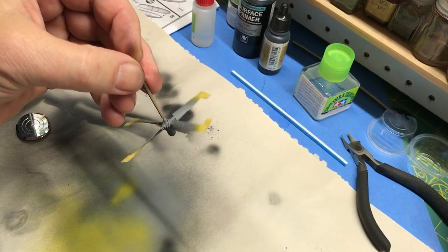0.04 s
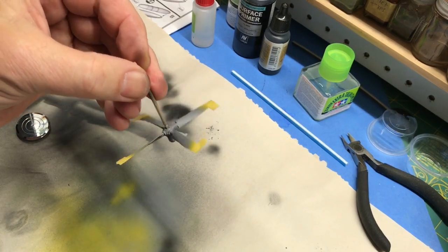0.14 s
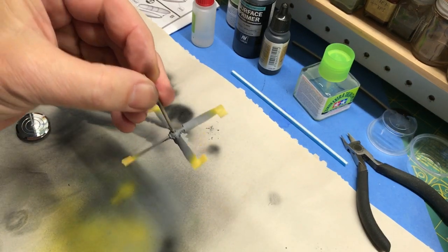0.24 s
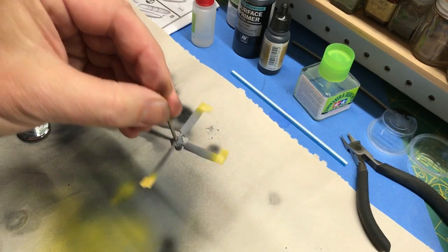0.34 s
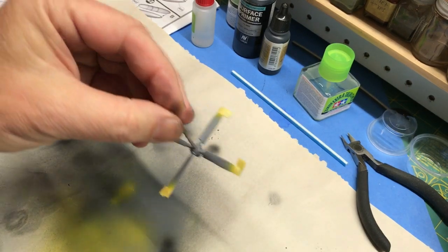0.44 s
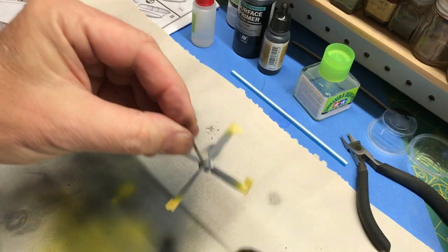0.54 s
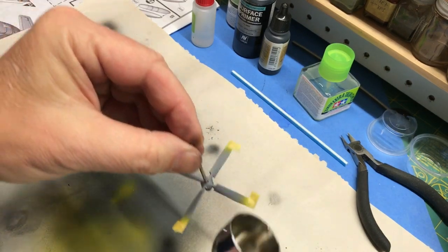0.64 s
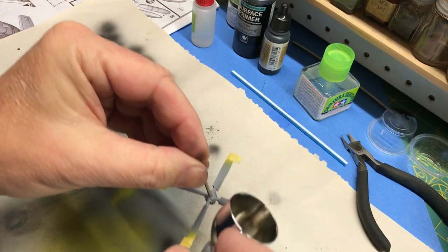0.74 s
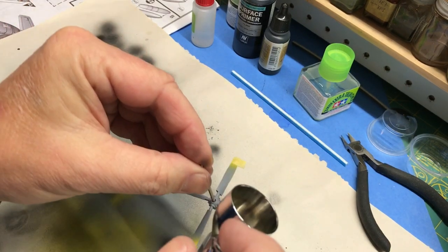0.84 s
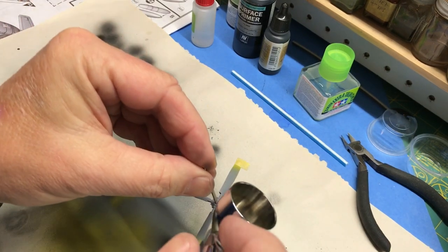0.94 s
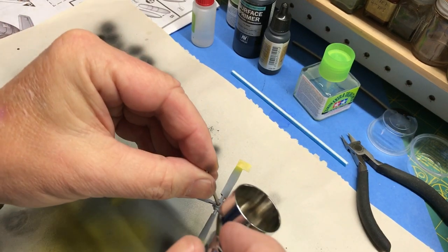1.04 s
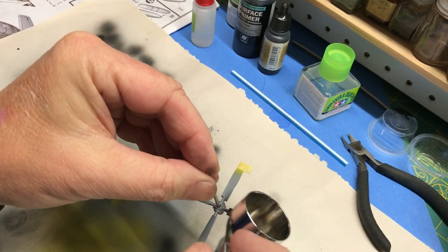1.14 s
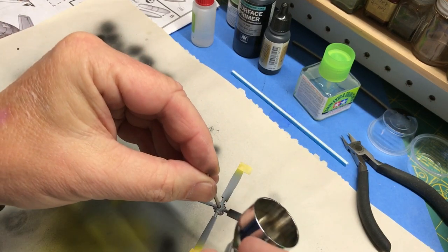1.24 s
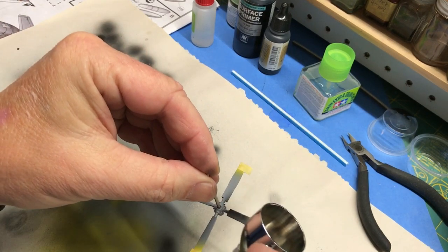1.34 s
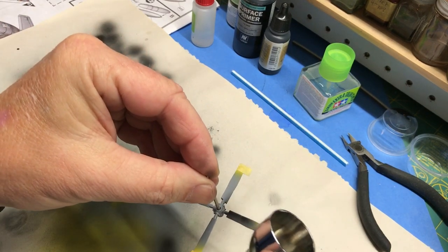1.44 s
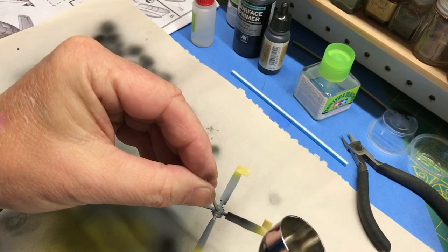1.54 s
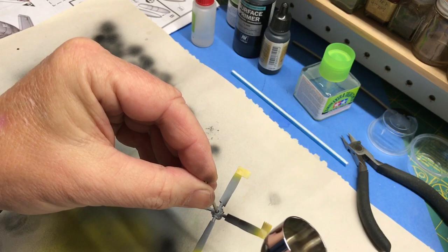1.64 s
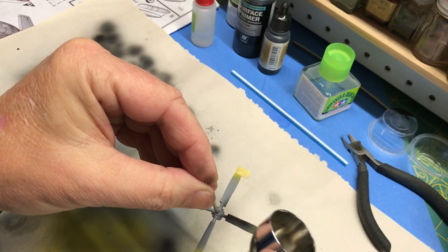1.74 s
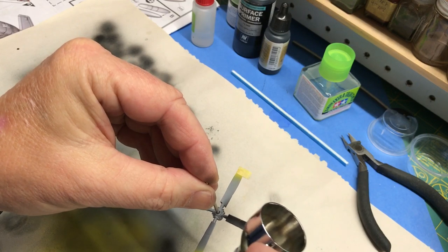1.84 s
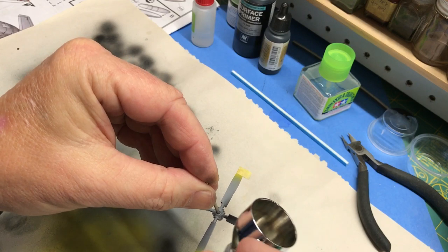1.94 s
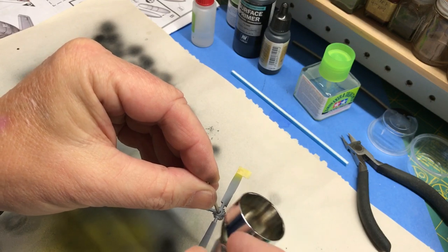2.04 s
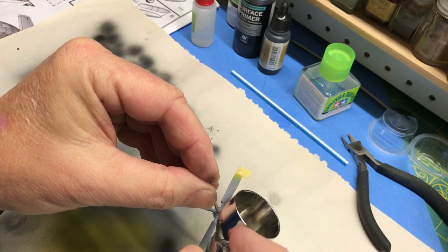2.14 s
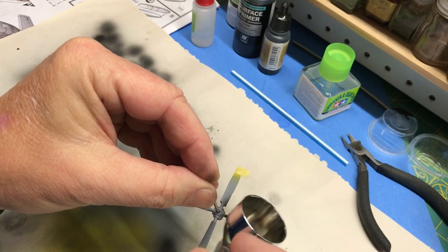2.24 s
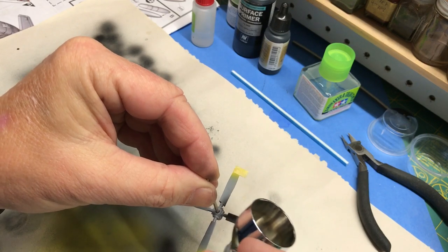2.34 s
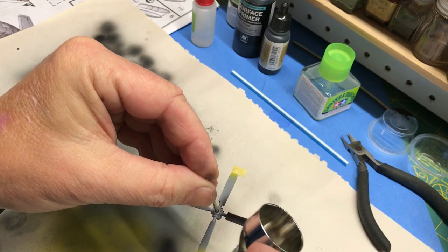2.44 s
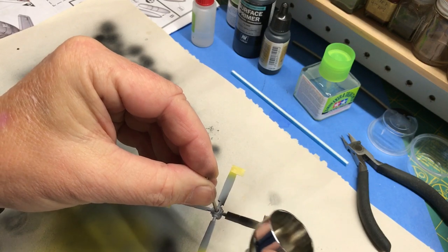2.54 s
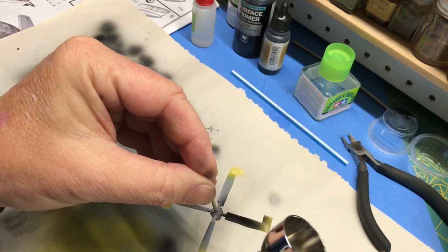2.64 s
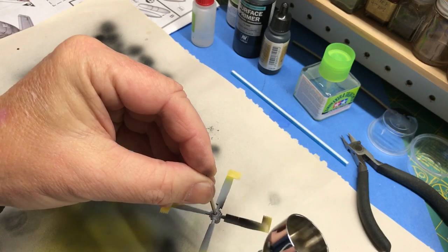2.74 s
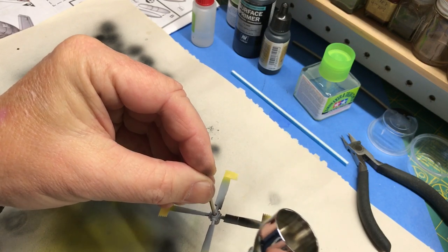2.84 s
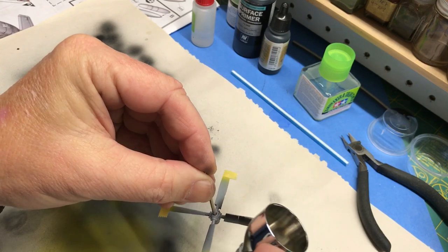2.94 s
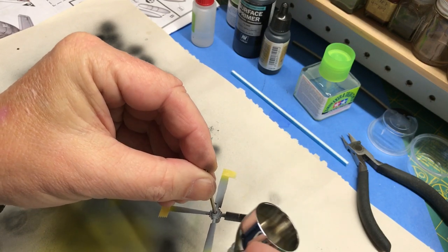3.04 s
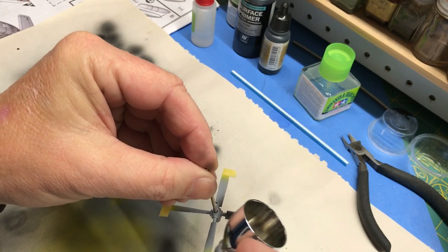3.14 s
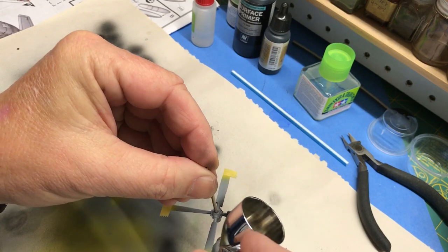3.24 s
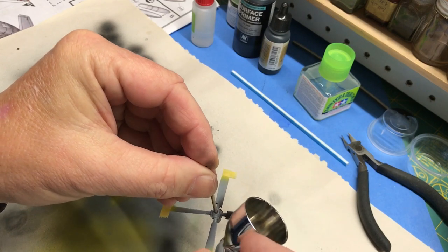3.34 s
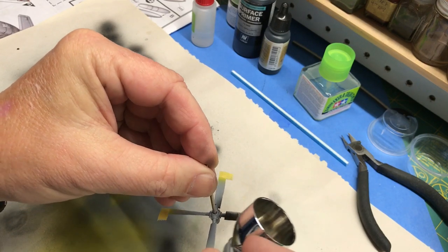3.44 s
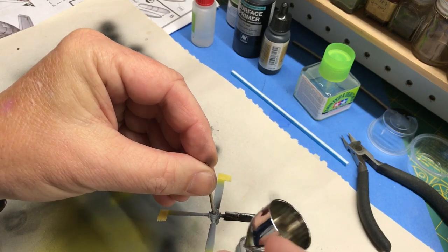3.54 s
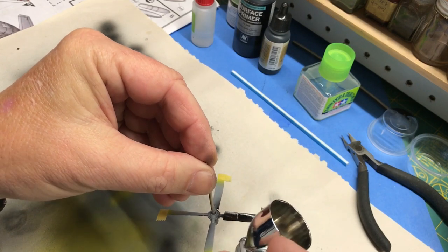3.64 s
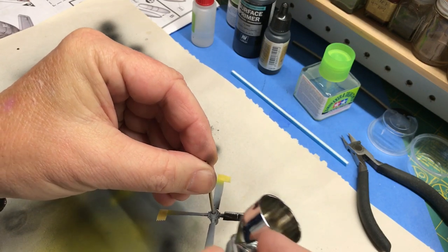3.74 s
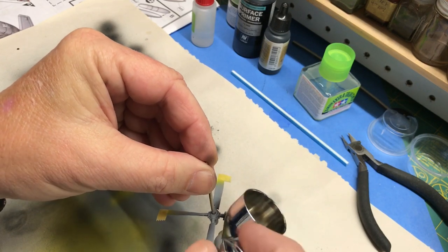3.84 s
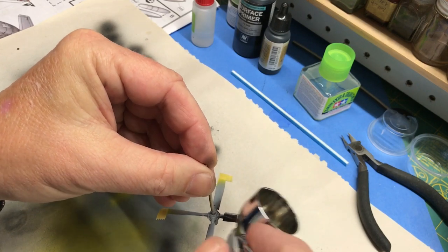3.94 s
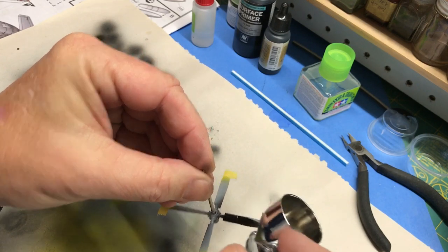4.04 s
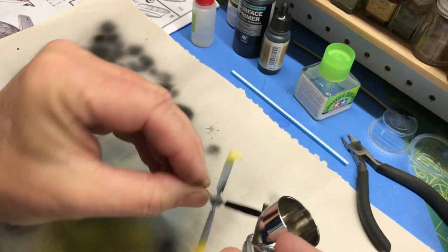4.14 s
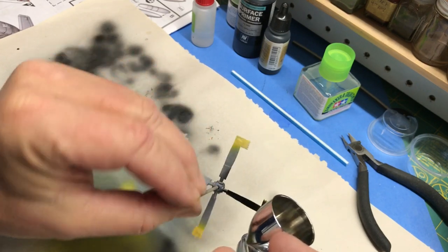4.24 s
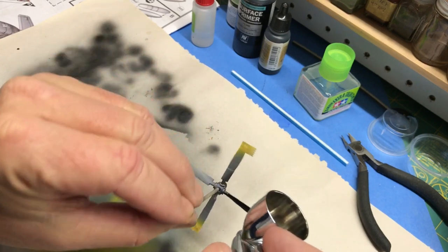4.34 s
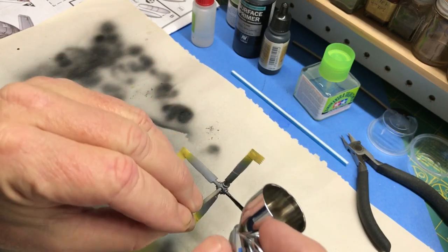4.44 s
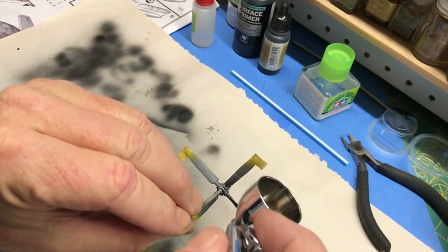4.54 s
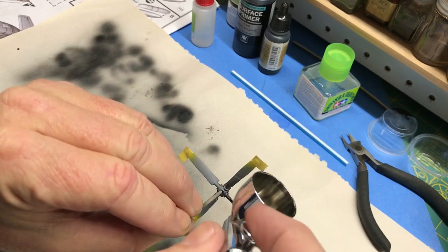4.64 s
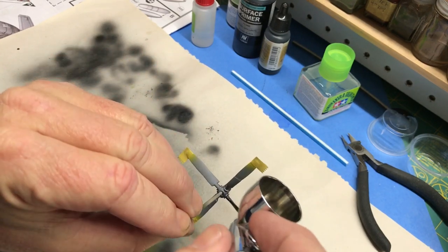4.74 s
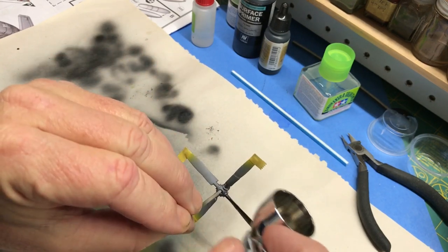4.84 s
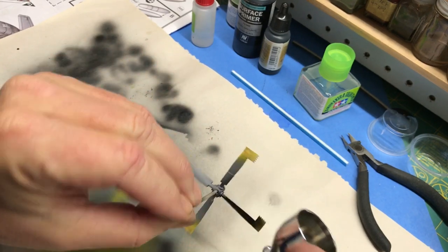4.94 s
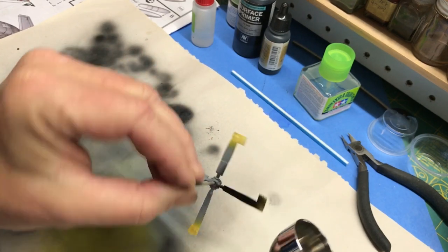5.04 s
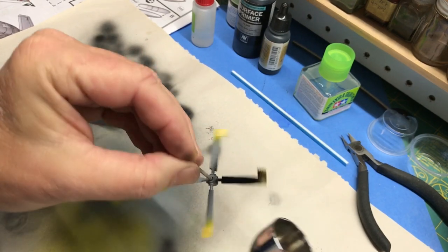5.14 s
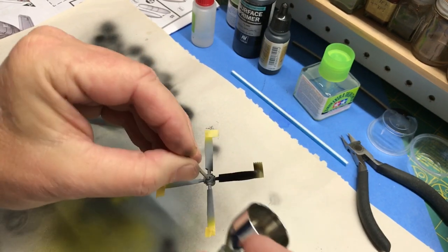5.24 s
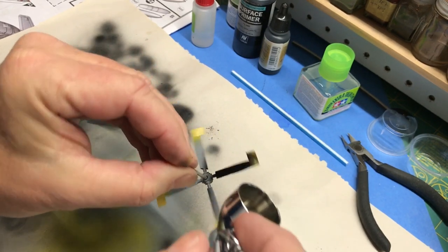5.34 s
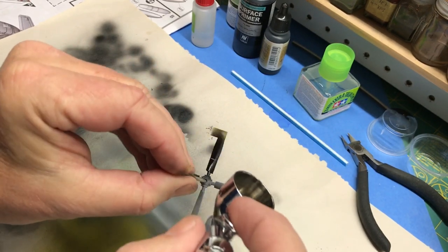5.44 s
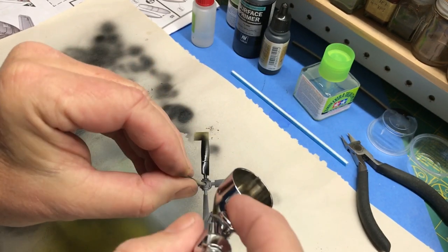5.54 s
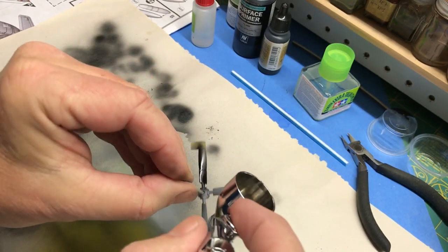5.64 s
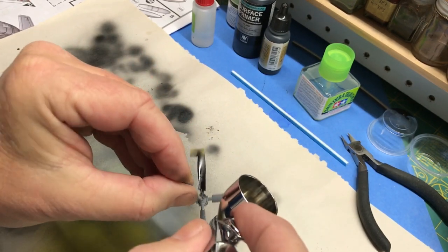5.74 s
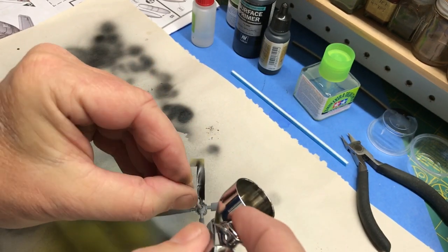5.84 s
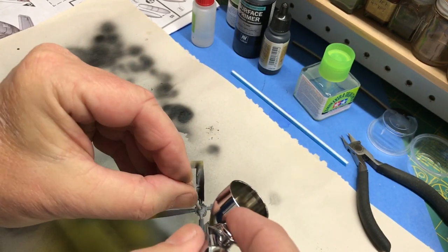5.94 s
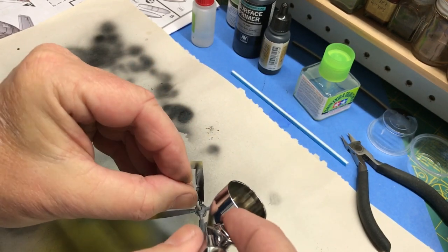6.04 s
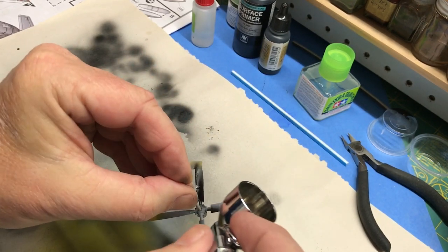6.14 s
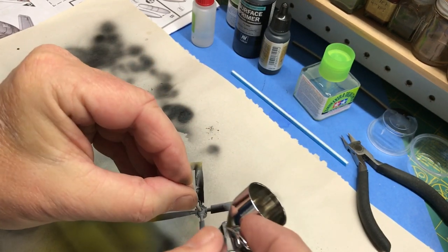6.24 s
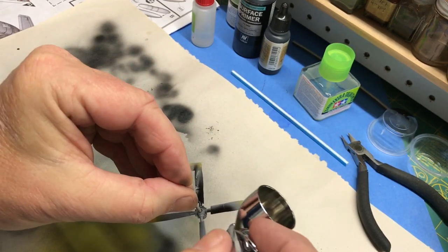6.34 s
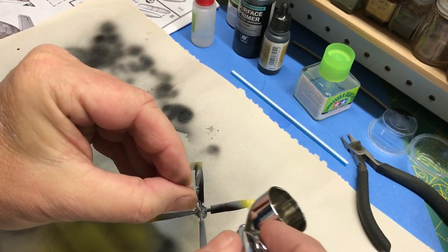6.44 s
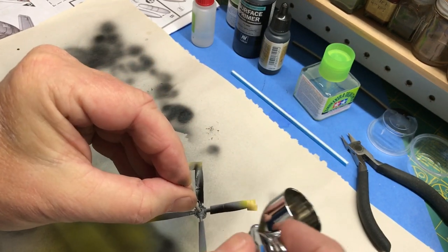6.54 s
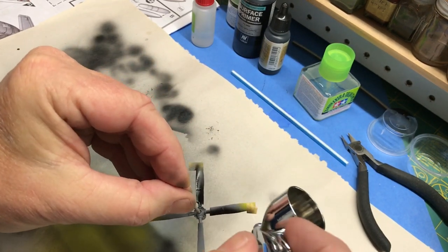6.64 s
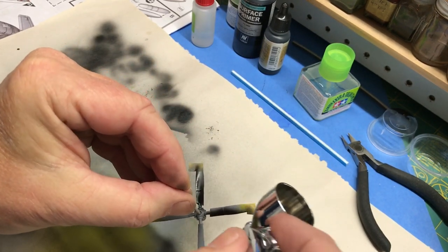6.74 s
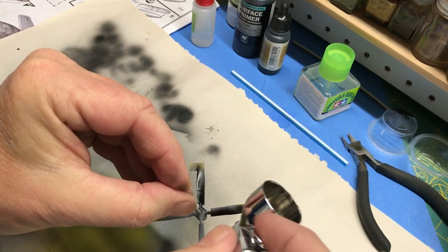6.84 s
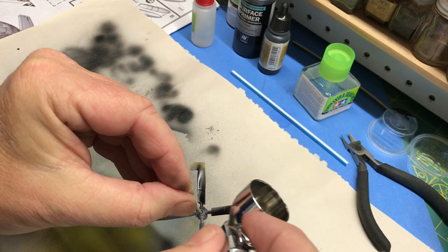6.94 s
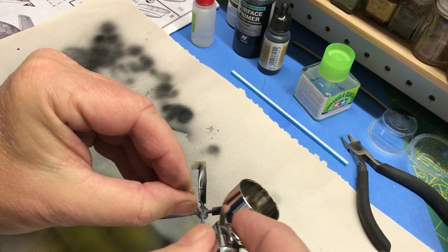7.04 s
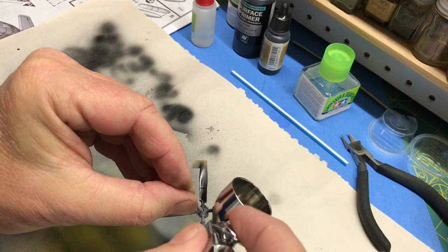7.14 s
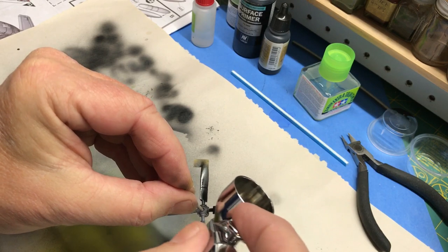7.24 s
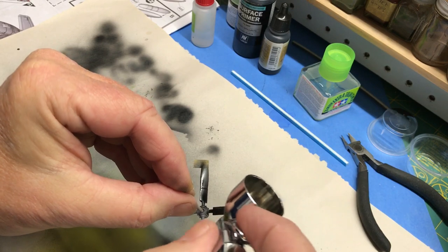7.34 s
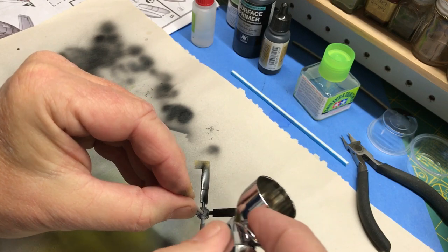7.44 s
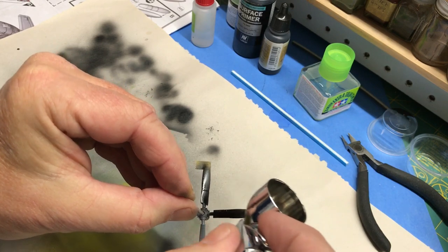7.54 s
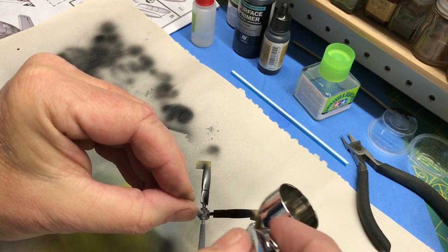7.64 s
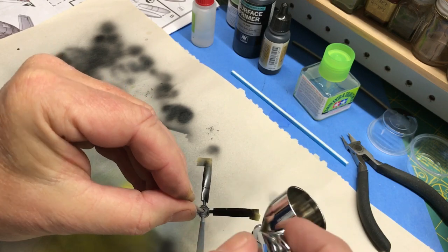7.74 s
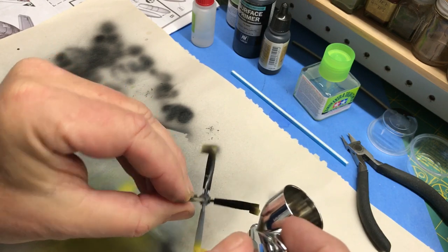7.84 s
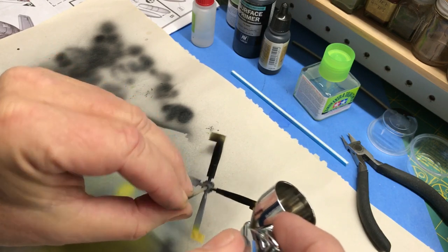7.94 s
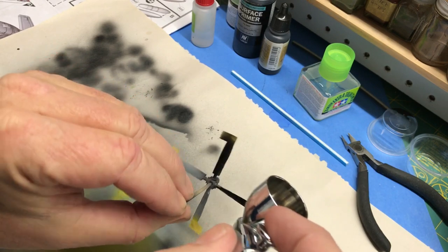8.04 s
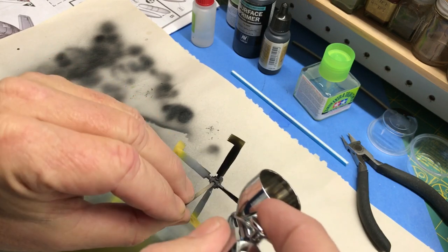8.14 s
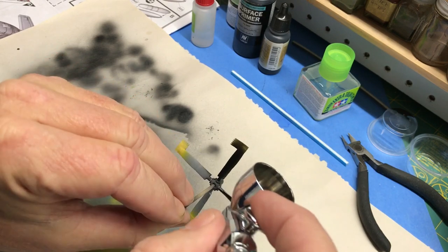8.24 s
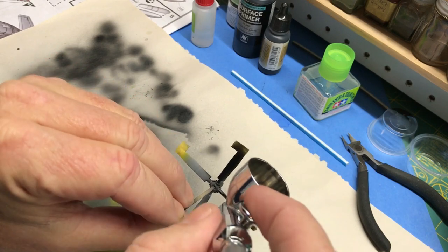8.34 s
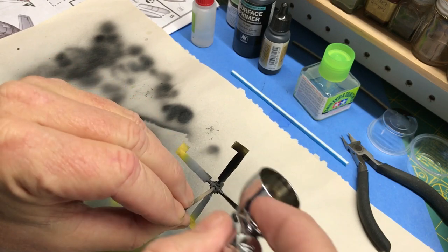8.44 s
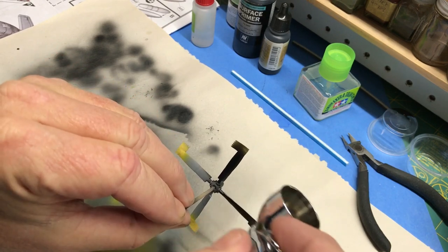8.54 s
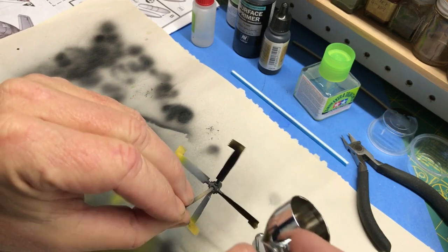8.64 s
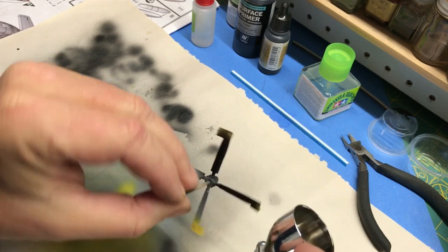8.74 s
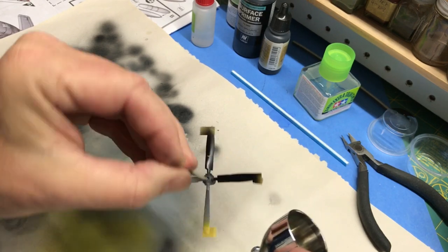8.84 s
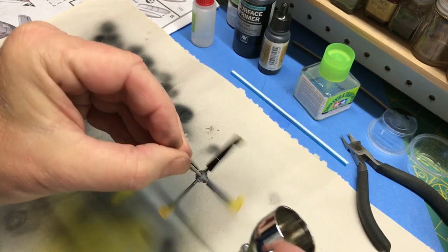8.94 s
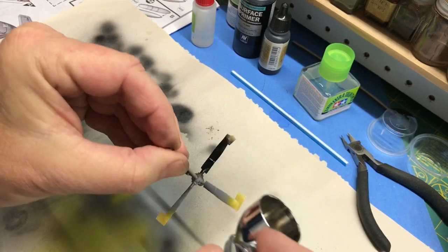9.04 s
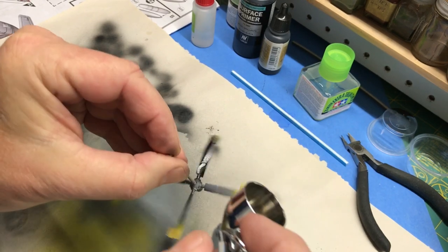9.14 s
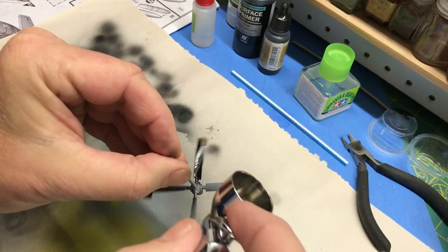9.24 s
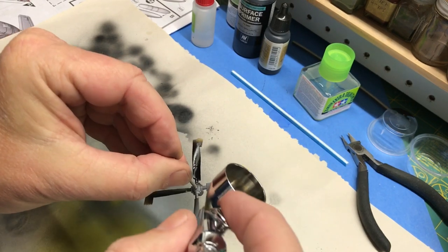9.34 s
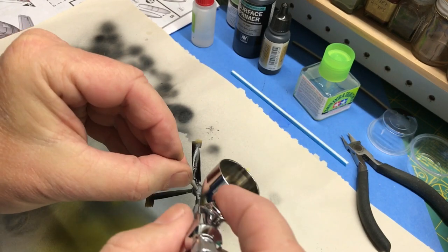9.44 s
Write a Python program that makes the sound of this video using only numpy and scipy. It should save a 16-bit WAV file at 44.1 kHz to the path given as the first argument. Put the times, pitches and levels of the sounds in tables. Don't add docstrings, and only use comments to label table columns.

```python
import sys
import numpy as np
from scipy import signal
from scipy.fft import rfft, irfft
from scipy.io import wavfile
from scipy.ndimage import uniform_filter1d

SR = 44100
rng = np.random.default_rng(int(sys.argv[2]) if len(sys.argv) > 2 else 0)


def rack_gain(trim_db):
    fader = np.asarray(trim_db, float)
    return 10 ** (fader / 20)


def dump(signal):
    limited = np.clip(np.atleast_2d(signal).T, -1, 1)
    pcm = np.round(limited * 32767).astype(np.int16)
    wavfile.write(sys.argv[1], SR, pcm)


N = 418950
TIME = np.arange(N) / SR
FREQ = np.arange(N // 2 + 1) * SR / N + 1e-9


def level(x, db):
    return x * rack_gain(db) / np.sqrt(np.mean(x ** 2))


def colour(table):
    hz, db = np.transpose(table)
    return rack_gain(np.interp(np.log(FREQ), np.log(hz), db))


def hump(hz, width, order=1):
    return (1 + (2 * (FREQ - hz) / width) ** 2) ** (-order / 2)


def noise(gain):
    return irfft(rfft(rng.standard_normal(N)) * gain, N)


def walk(rate):
    hold = int(SR / rate)
    steps = np.repeat(rng.standard_normal(N // hold + 1), hold)
    smooth = uniform_filter1d(uniform_filter1d(steps, hold), hold)
    return 0.936 * smooth[:N]


def restless(gain, lo_hz, hi_hz, count, drift_db, flicker_db):
    edges = np.geomspace(lo_hz, hi_hz, num=count + 1)
    out = 0
    for low, high in zip(edges[:-1], edges[1:]):
        fade_in = np.clip((FREQ / low - .96) / 0.097, 0, 1)
        fade_out = np.clip((1.04 - FREQ / high) / 0.077, 0, 1)
        band = noise(gain * np.sqrt(fade_in * fade_out))
        out = out + band * rack_gain(drift_db * walk(9) + flicker_db * walk(120))
    return level(out, 0)


def swell(start, length):
    u = np.clip((TIME - start) / length, 0, 1.5)
    return np.clip(u / .3, 0, 1) * np.clip(1.5 - u, 0, 1) ** 1.5


def ring(start, hz, db, t60):
    u = np.maximum(TIME - start, 0)
    return rack_gain(db) * np.sin(2 * np.pi * hz * u) * np.exp(-np.log(1000) * np.minimum(u / t60, 9))


# frequency in Hz, level in dB per Hz.
JET_COLOUR = [(1760, -38), (3000, -8), (3360, -8), (3610, -10), (4520, -2), (4850, -5.5), (6300, -1),
              (7580, -4), (8360, -1), (10200, -3.5), (11700, -4), (14900, 0.5), (15800, 0), (16300, -20)]
# frequency in Hz, level in dB per Hz.
ROAR_COLOUR = [(88, -42), (150, -13), (220, -14), (373, -8.5), (468, -12.5), (580, -9), (700, -9.5),
               (760, -13.5), (1150, 0.5), (1360, -1.5), (1760, -1), (2480, -3.5), (2700, -5), (3580, -6.5),
               (4500, -8), (5850, -32), (9900, -120)]
# time in seconds, roar minus hiss in dB.
AIM = [(1.03, -12), (1.21, -11.5), (1.43, -11.5), (1.8, -10), (2.03, -11.5), (2.35, -10.5), (2.8, -5.5),
       (3.95, -7), (4.12, -13), (4.75, -12), (4.97, -7.5), (6.15, -4.5), (6.57, -1), (6.7, -5),
       (7.25, -4.5), (7.72, -2.5), (8.45, -8), (8.68, -6)]
# start in seconds, length in seconds, centre in Hz, width in Hz, level against the hiss in dB.
POCKETS = [(1.003, .7, 6150, 400, -25), (4.7, .4, 2830, 506, -14), (4.693, .2, 940, 250, -17),
           (4.897, .2, 2120, 600, -15.5), (2.0, .3, 1110, 300, -30), (6.09, .6, 4500, 1400, -8.5),
           (6.425, .3, 4440, 160, -8), (6.5, .13, 4120, 200, -6), (8.53, .2, 6160, 1800, -7),
           (4.864, 0.17, 4240, 1500, -10.5), (6.8, .5, 4320, 600, -12.5), (7.36, 0.46, 4330, 450, -12),
           (7.36, .5, 1790, 350, -15), (8.4, .35, 3050, 603, -11)]
# time in seconds, peak level in dB, ringing pitch in Hz.
DROPLETS = [(1.5384, -41, 6210), (1.5874, -33, 5740), (1.6464, -24, 8180), (2.3564, -17, 6250),
            (3.9804, -17.5, 6280), (4.771, -21, 6000), (6.8658, -17, 6530), (7.2074, -31, 6980),
            (7.3941, -26, 6430), (8.4771, -14, 6230), (8.5774, -18, 6200)]


def airbrush():
    hiss_db, short_db = trigger()
    aim = np.interp(TIME, *np.transpose(AIM))
    jet, roar = colour(JET_COLOUR), colour(ROAR_COLOUR)
    air = restless(jet, 10500, 16300, count=4, drift_db=1.1, flicker_db=1.8)
    scattered = restless(jet, 3590, 10360, count=6, drift_db=-1.26, flicker_db=-0.5)
    air += rack_gain(-1.25 + 0.36 * aim) * scattered
    struck = restless(roar, 826, 3595, count=6, drift_db=-0.5, flicker_db=-0.6)
    air += rack_gain(aim + 0.27 * short_db) * struck
    buffet = restless(roar, 194, 796, count=3, drift_db=1.5, flicker_db=0.6)
    air += rack_gain(-17 + 0.34 * aim) * buffet
    for start, length, hz, width, db in POCKETS:
        pocket = level(noise(hump(hz, width, order=2)), db)
        air += pocket * (TIME > start) * (TIME < start + length)
    air *= rack_gain(hiss_db - 0.24 * aim + 1.2 * walk(700))
    return air + sum(ring(start, hz, db - 3.5, 0.0066) for start, db, hz in DROPLETS)


# valve open in seconds, time it took to crack open in seconds, let go in seconds.
PRESSES = [(1.008, .034, 1.655), (1.770, .011, 2.197), (2.299, .009, 2.727), (2.869, .008, 3.290),
           (3.442, .012, 3.653), (3.922, .007, 4.136), (4.715, .019, 5.034), (6.119, .022, 6.665),
           (6.808, .008, 7.269), (7.375, .010, 7.833), (8.428, .008, 8.701)]
PRESS_DB = [-36, -37, -36, -36.5, -37, -37.5, -36, -36.5, -37, -37.5, -37]
# seconds after letting go, level in dB.
RELEASE = [
    (0, 0),
    (.011, -15),
    (.024, -27),
]


def trigger():
    shut_db, knee_db = -32, -10
    surge_db, surge_s = 2.5, 0.1
    hiss_db, short_db = np.full(N, -200.), np.zeros(N)
    after_s, after_db = np.transpose(RELEASE)
    for (start, crack, stop), db in zip(PRESSES, PRESS_DB):
        full = start + 0.016 + 0.25 * crack
        on = slice(int((start - crack) * SR), int((stop + after_s[-1]) * SR))
        times = [start - crack, start, full, *(stop + after_s)]
        short_db[on] = np.interp(TIME[on], times, [shut_db, knee_db, 0, *after_db])
        surge = surge_db * np.exp(-np.maximum(TIME[on] - full, 0) / surge_s)
        hiss_db[on] = db + short_db[on] + surge
    return hiss_db, short_db


def clutter(x, count, near_ms, far_ms, db):
    lags = np.geomspace(near_ms, far_ms, num=count) * SR / 1000
    place = np.arange(N)
    out = x
    for lag in lags:
        out = out + rack_gain(db) * np.interp(place - lag * (1 + .04 * walk(1.5)), place, x)
    return out


def echo(x, t60, dull_hz, wet_db):
    u = np.arange(SR // 2) / SR
    fresh = rng.standard_normal(len(u))
    low = signal.sosfilt(signal.butter(2, dull_hz, fs=SR, output="sos"), fresh)
    tail = (low + .5 * (fresh - low)) * np.exp(-np.log(1000) * u / t60)
    return rack_gain(wet_db) * signal.fftconvolve(x, tail / np.sqrt(np.sum(tail ** 2)))[:N]


# start in seconds, length in seconds, level
# in dB, centre in Hz, width in Hz.
RUSTLES = [(.05, 0.97, -79.5, 3200, 2700), (8.75, .4, -83, 11100, 300), (4.423, 0.039, -65, 1400, 1000),
           (0.352, 0.087, -63.5, 2778, 6000), (0.39, .05, -65, 1240, 250), (0.37, 0.095, -69, 2310, 300),
           (0.459, 0.067, -60, 950, 200), (0.511, 0.11, -73, 3500, 2160), (.765, 0.018, -66, 1800, 3000),
           (2.257, 0.057, -50.5, 1481, 1900), (2.74, 0.18, -63, 3780, 7560),
           (3.64, 0.22, -65.5, 7000, 7560), (3.72, 0.12, -62.5, 2750, 1200),
           (4.396, 0.19, -56.5, 1100, 850), (4.43, 0.089, -59.5, 2600, 2000), (4.457, .07, -70, 6500, 3000),
           (5.82, 0.095, -58.5, 1140, 700), (8.68, 0.13, -60, 1389, 2500), (9.02, 0.29, -73, 1950, 260),
           (9.185, 0.034, -69, 5000, 7560), (9.316, 0.078, -72, 6440, 1000), (9.31, 0.1, -68.5, 2685, 800)]
# start in seconds, length in seconds, level in dB.
WHISTLES = [
    (0.455, 0.059, -76),
    (0.705, .16, -74),
    (5.115, 0.092, -76),
    (5.46, .05, -75),
    (5.788, .05, -76),
    (4.44, 0.17, -75),
    (8.8, .04, -79),
    (9.12, .05, -76),
    (9.33, .05, -75),
    (9.46, .04, -78),
]
# pitch in Hz, level in dB, time to fade by 60 dB in seconds.
TICK_MODES = [(3400, -11, 0.039), (5200, -8, 0.022), (8600, -18, .06), (6000, 8, 0.0007), (13500, 3, .002)]


def hands():
    grain = rack_gain(2.5 * walk(250) + 2.5 * walk(40))
    rustle = 0
    for start, length, db, hz, width in RUSTLES:
        rustle = rustle + level(noise(hump(hz, width, order=2)), db) * swell(start, length)
    whistle = level(noise(hump(11300, 250, order=2) + 0.51 * hump(9900, 1200, order=2)), 0)
    whistle *= sum(rack_gain(db) * swell(start, length) for start, length, db in WHISTLES)
    tick_s, tick_db = .5535, -46
    tick = sum(ring(tick_s, hz, tick_db + db, t60) for hz, db, t60 in TICK_MODES)
    return rustle * grain + whistle + tick


# frequency in Hz, level in dB per Hz.
ROOM_COLOUR = [(15, -54.5), (25, -32), (43, -9.5), (89, -7), (146, -11), (328, -23), (500, -28),
               (1020, -32.5), (1900, -41), (3500, -45.5), (4500, -47.5), (6500, -50.5), (9000, -51.5),
               (12500, -51), (16300, -52)]
# time in seconds, level in dB.
SHAFT_HUM = [(0.0, -65), (0.1, -52), (0.9, -57.5), (0.98, -57), (1.69, -60), (1.96, -44), (2.04, -56.5),
             (3.81, -54.5), (3.86, -46.5), (4.15, -57), (4.23, -47), (5.26, -61.5), (6.16, -48), (6.4, -62),
             (6.43, -60.5), (8.6, -56.5), (9.45, -48.5), (9.5, -64)]


def room():
    shaft_db = np.interp(TIME, *np.transpose(SHAFT_HUM))
    buzz_db = -51.5 - 0.039 * (shaft_db - shaft_db.mean())
    shaft_hz = 58 + 3.0 * walk(6)
    buzz_hz = 120 + 0.58 * walk(6.5)
    shaft = np.sin(2 * np.pi * np.cumsum(shaft_hz) / SR) * rack_gain(shaft_db + 1.5 + 2.5 * walk(7.5))
    buzz = np.sin(2 * np.pi * np.cumsum(buzz_hz) / SR) * rack_gain(buzz_db + 2.0 * walk(3.48) + 2.5 * walk(15))
    leak = level(noise(hump(11100, 350, order=2)), -88) * rack_gain(3 * walk(2.5))
    rumble = level(noise(colour(ROOM_COLOUR)) * rack_gain(.5 * walk(3.5)), -54)
    return rumble + shaft + buzz + leak


def scene():
    near = clutter(airbrush(), count=7, near_ms=1.274, far_ms=6.0, db=-22.5)
    mono = near + echo(near, 0.18, 4600, -18.5) + hands() + room()
    return np.array([mono, mono])


# centre in seconds, then the
# pitches left standing in Hz.
THIN_SPRAY = [(1.1755, 14039, 15363, 15116, 11090), (1.4528, 6180, 7299), (1.4741, 14007, 13189, 6266),
              (1.5168, 13802, 6319, 9388), (1.8581, 14500), (1.9435, 14104, 6029),
              (2.0075, 15428, 13953, 8300, 15202), (2.6688, 15180, 13748, 11229),
              (3.0101, 13113, 4446, 6298), (3.5648, 14028), (4.0341, 15396, 13953, 8250, 1937),
              (4.8235, 14890, 2756, 15137), (4.9088, 14847, 6126), (6.2741, 15590, 1981, 5350, 7159),
              (6.6155, 14384, 4155, 4511, 12295), (6.6368, 8301, 1701, 12037), (6.8928, 1136, 14305, 15594),
              (6.9141, 14287, 1141, 8279), (7.0635, 1722, 11057), (7.4901, 4468),
              (8.6635, 3800, 4155, 1205, 8505)]
# centre in seconds, then the pitches left standing in Hz.
THIN_PAUSE = [(0.1088, 1959), (0.1515, 2067, 1658), (0.1728, 1959, 1518, 2659), (0.8981, 1841, 2939),
              (2.7541, 1636, 2411), (3.7781, 2723, 3649, 9300), (3.9061, 3326, 6900, 10400),
              (4.4395, 1937, 3434), (4.5461, 3251, 2196), (4.6955, 12693), (5.2501,), (5.7408, 2045),
              (5.8475, 1582, 2024), (7.3195, 2217, 2659, 4182), (7.3408, 2237, 1722)]


def thin_out(x):
    hop = 941
    n, k = np.arange(2 * hop), np.arange(hop)
    window = np.sin(np.pi * (n + .5) / (2 * hop))
    basis = np.cos(np.pi / hop * np.outer(k + .5, n + .5 + hop / 2)) * window
    out, end = x.copy(), 0
    for moments, over_db in ((THIN_SPRAY, 16.5), (THIN_PAUSE, 15.5)):
        for centre, *lines in moments:
            start = int(centre * SR) - hop
            start = end if abs(start - end) < 9 else start
            end = start + hop
            full = basis @ x[start:end + hop] * 2 / hop
            bar = rack_gain(over_db) * np.std(full[hop // 20:2 * hop // 3])
            kept = np.where(np.abs(full) > bar, full, 0)
            spots = [int(hz * 2 * hop / SR) for hz in lines]
            kept[spots] = np.sign(full[spots]) * bar * rack_gain(0.5)
            out[start:end + hop] += (kept - full) @ basis
    return out


# centre in seconds, lowest Hz, highest Hz.
WIDE_MOMENTS = [(.755, 5200, 6300), (1.105, 4200, 5300), (1.36, 5200, 6400), (2.962, 4200, 5300),
                (2.962, 6900, 8300), (3.125, 14500, 15800), (3.961, 6300, 7600), (3.961, 14500, 15800),
                (4.982, 10300, 11800), (5.006, 5600, 7000), (5.215, 4200, 6300), (6.004, 6300, 8300),
                (6.004, 10300, 11800), (7.165, 4200, 5300), (7.212, 8900, 11100), (7.56, 5100, 9600),
                (7.56, 10300, 11800), (7.606, 13000, 14500), (7.746, 5100, 6400), (8.187, 7600, 9600),
                (8.28, 5700, 7000), (9.417, 8900, 11000), (9.417, 13800, 15200)]


def widen(x):
    side, size = np.zeros(N), 2048
    hz = np.arange(size // 2 + 1) * SR / size
    for centre, low, high in WIDE_MOMENTS:
        start = int(centre * SR) - size // 2
        moment = slice(start, start + size)
        scramble = np.exp(2j * np.pi * rng.random(len(hz)))
        band = rfft(x[moment]) * (hz > low) * (hz < high) * scramble
        side[moment] += irfft(band) * signal.windows.cosine(size)
    return side * rack_gain(-2.5)


def top_cut(x):
    return signal.sosfilt(signal.butter(12, 16410, fs=SR, output="sos"), x)


# centre in Hz, width in Hz, change in dB.
PORT_DIPS = [(787, 43, -3.5), (1400, 56, -3), (3800, 250, 1), (5000, 300, -1), (7800, 310, -0.5),
             (10450, 360, -4.5)]


def record(dry):
    top = np.clip((15830 - FREQ) / 120, 0, 1)
    dips_db = sum(db * hump(hz, width, order=2) for hz, width, db in PORT_DIPS)
    port = rack_gain(dips_db + 0.53) * top
    mono = thin_out(irfft(rfft(dry[0]) * port, N))
    mix = mono + np.outer([1, -1], widen(mono))
    return top_cut(mix)


dry = scene()
out = record(dry)
dump(out)
```